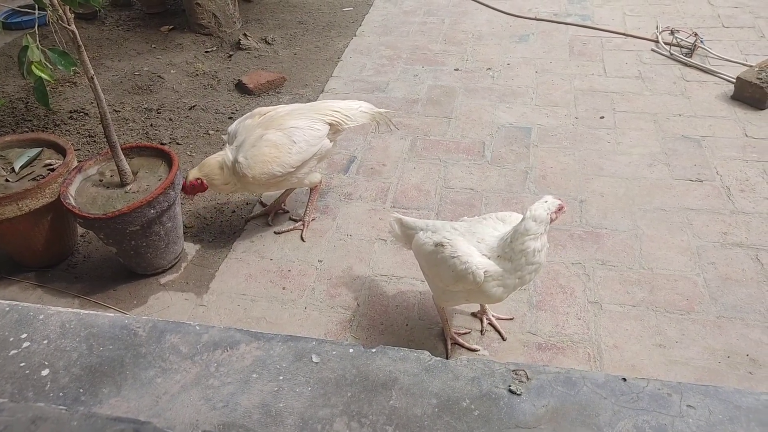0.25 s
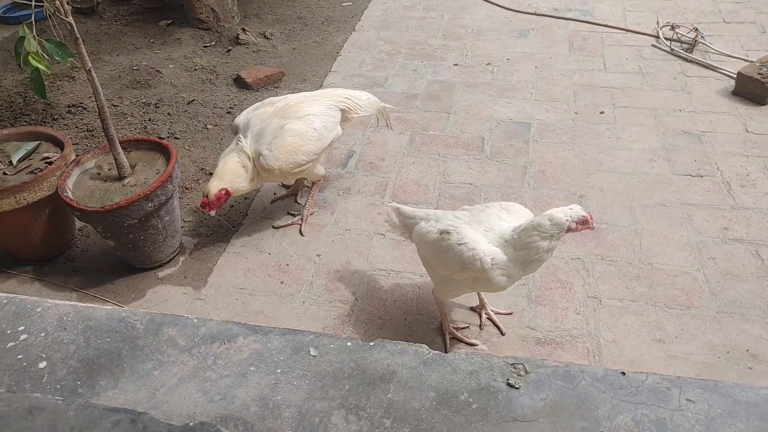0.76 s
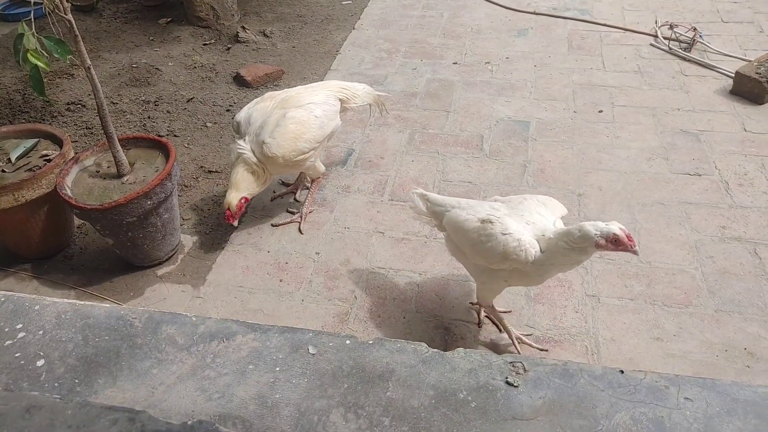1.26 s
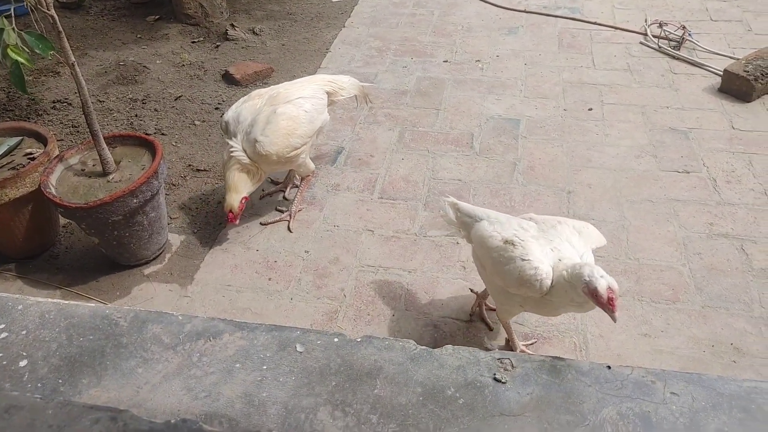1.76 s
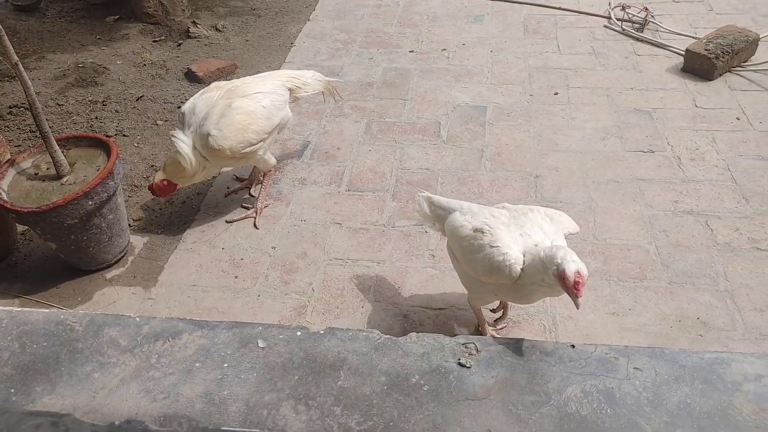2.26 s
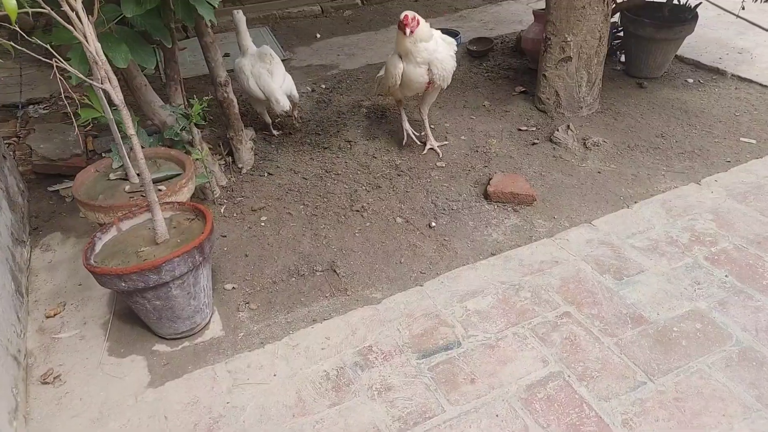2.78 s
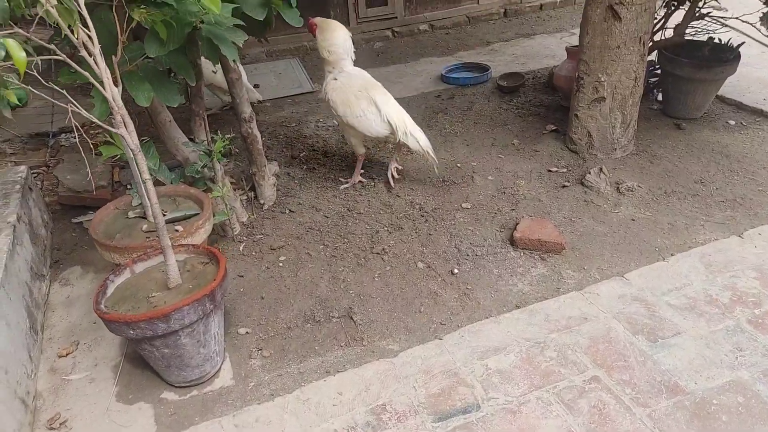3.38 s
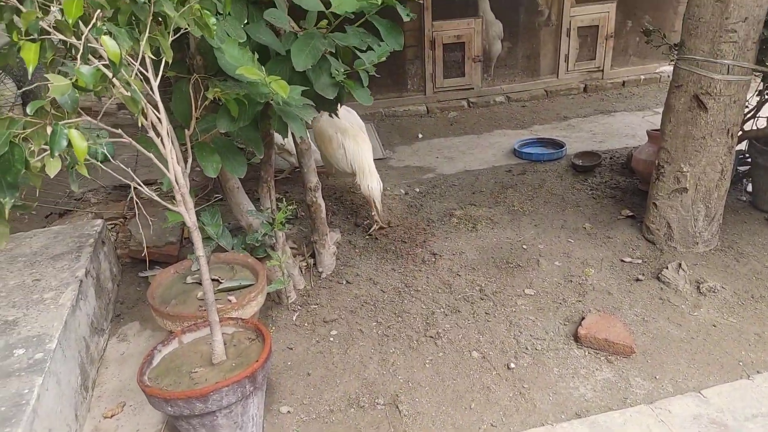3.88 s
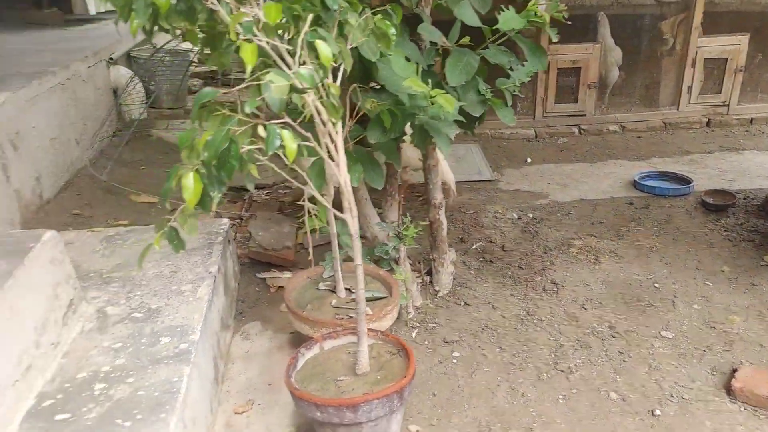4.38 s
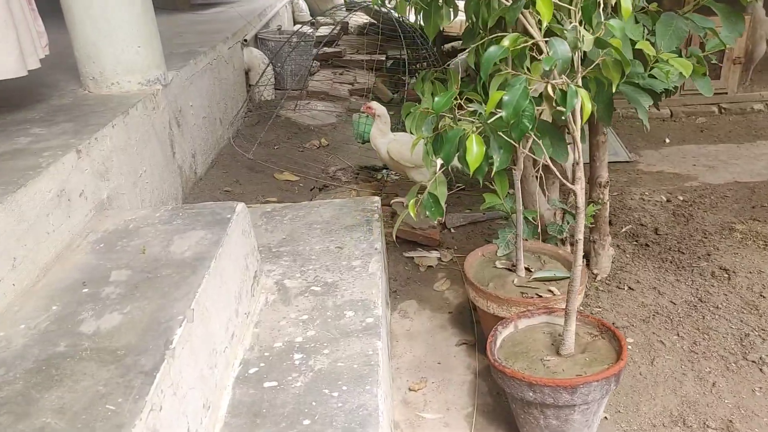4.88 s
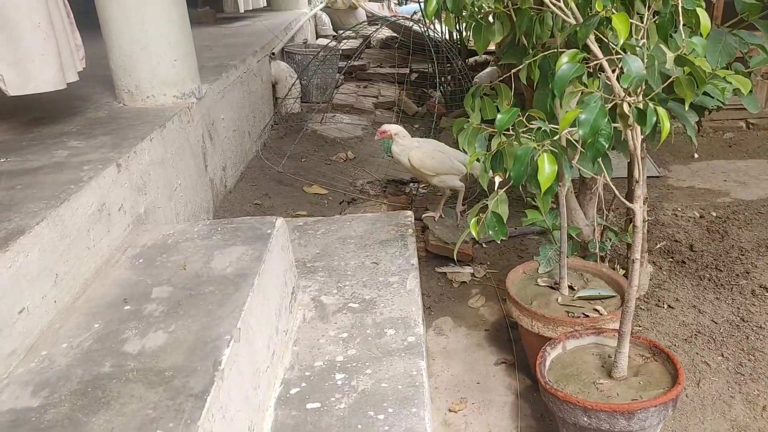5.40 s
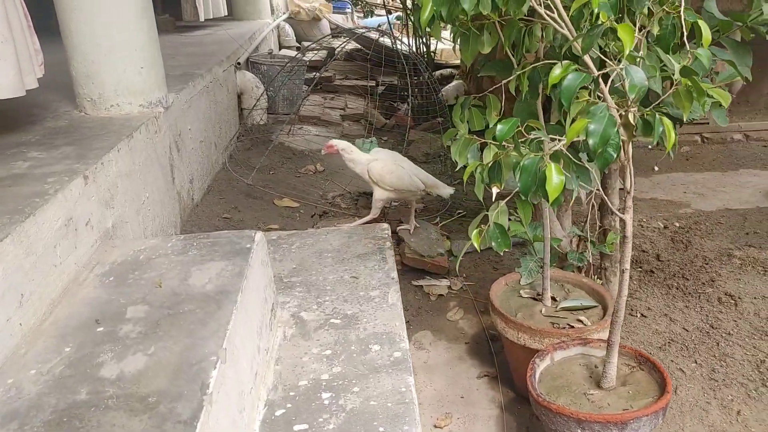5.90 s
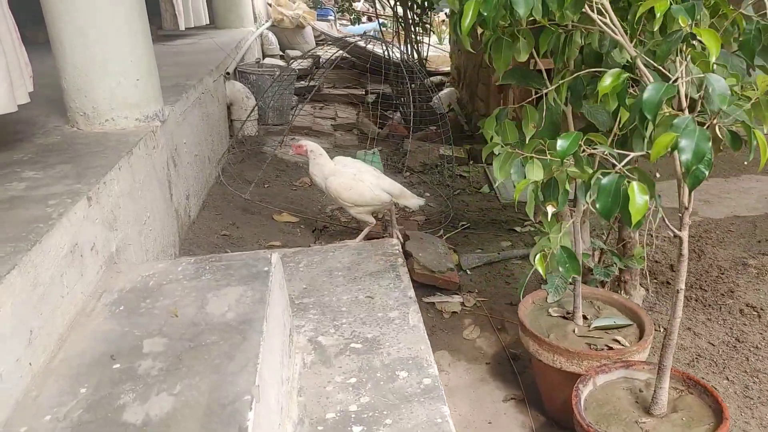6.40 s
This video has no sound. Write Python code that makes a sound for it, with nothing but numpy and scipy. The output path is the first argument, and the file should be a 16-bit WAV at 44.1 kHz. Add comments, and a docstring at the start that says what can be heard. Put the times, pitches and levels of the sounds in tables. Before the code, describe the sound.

A walled yard with hard, lively reflections and quiet outdoor air. From 0 s young birds peep without pause, slightly to the right: piercing whistles hold, plunge and end in a tiny chip, surrounded by a blurred wash of falling chirps and faint high chatter. Hens nearly ahead give round, hollow boks at about 0.2, 0.4, 0.7, 1.1 and 1.6 s, with hoarse clucks near 0.4, 0.9 and 2.0. A faint distant motor hum swells around 1.5 and 2.5. Everything cuts out very briefly at 2.6. Rough clucks follow near 3.1 and 3.7, with dry foot scuffs at 3.3 and 3.6, while strong peeps ring out around 3.1, 3.6 and 4.1. A soft scuff comes at 4.4, the hum returns near 4.9, and a cluck sounds at 5.1. A faint scuff follows at 5.6. Clucks and soft boks return at 6.0, then a low rolling croak at 6.4 and a last cluck at 6.6 amid denser chirping.

```python
"""Hens cluck in a walled brick courtyard: gliding tones make round boks, pulse-driven resonances hoarse clucks.
Young birds peep all the time: swept sines are held, plunge and end in an octave chip, amid a reverberant wash
of falling chirps and high chatter; a wavering sine is the faint high octave of peeps near 4.7 kHz. Feet scuff
dry ground as clumped, filtered noise; a distant motor drones as narrow noise bands over outdoor air; once the
sound drops out briefly."""
import sys
import numpy as np
from scipy import signal
from scipy.fft import rfft, irfft, next_fast_len
from scipy.io import wavfile
from scipy.ndimage import map_coordinates

SR = 44100
rng = np.random.default_rng(int(sys.argv[2]) if len(sys.argv) > 2 else 0)


def wav_out(sig):
    """Save sig, one row per channel (or a flat mono array), as 16-bit PCM at SR to the path in sys.argv[1]."""
    wavfile.write(sys.argv[1], SR, np.round(np.clip(np.atleast_2d(sig).T, -1, 1) * 32767).astype(np.int16))


N = 293265  # length in samples


def amp(db):
    """Level in decibels to amplitude ratio."""
    return 10 ** (np.asarray(db) / 20)


def unit(x):
    """Normalization to an RMS value of one."""
    return x / np.sqrt(np.mean(x ** 2) + 1e-20)


def at(rows, s):
    """Linear interpolation of a (t/s, value) curve at time s."""
    return np.interp(s, *np.transpose(rows))


def curve(rows):
    """Linear interpolation of a (t/s, value) curve at every sample."""
    return at(rows, np.arange(N) / SR)


def along(points, hz):
    """Interpolation of (f/Hz, value) points on a logarithmic frequency axis."""
    f, v = np.transpose(points)
    return np.interp(np.log(hz + 1), np.log(f + 1), v)


def progress(length):
    """Normalized time of a call, from 0 to 1."""
    return np.linspace(0, 1, int(length * SR))


def wobble(rate, n):
    """Band-limited fluctuation: a smooth random curve with rate knots a second."""
    knots = rng.standard_normal(int(n * rate / SR) + 4)
    return map_coordinates(knots, [np.arange(n) * rate / SR])


def phase_of(hz):
    """Phase as the time integral of instantaneous frequency."""
    return 2 * np.pi * np.cumsum(hz) / SR


def filtered(x, response):
    """Linear filtering: the spectrum times a complex frequency response."""
    n = x.shape[-1]
    m = next_fast_len(n + 4096)
    return irfft(rfft(x, m) * response(np.fft.rfftfreq(m, 1 / SR)), m)[..., :n]


def resonances(modes, f):
    """Modal superposition: causal second-order resonances of alternating sign."""
    total = 0
    for k, (center, width, db) in enumerate(modes):
        mode = 1j * f * width / (center * center - f * f + 1j * f * width)
        total = total + (-1) ** k * amp(db) * mode
    return total


# interaural likeness of diffuse sound: (f/Hz, left-right correlation)
LIKENESS = [(60, 0.66), (140, 0.94), (640, 0.49), (1500, 0.019)]


def diffuse(n):
    """Diffuse field: stereo noise that is alike in the bass and unrelated in the treble."""
    turn = lambda f: np.arccos(np.clip(along(LIKENESS, f), -1, 1)) / 2
    split = lambda f: np.array([np.cos(turn(f)), np.sin(turn(f))])
    mid, side = filtered(rng.standard_normal((2, n)), split)
    return np.array([mid + side, mid - side])


def yard(x, wet_db, t60, lead_ms=0, wall_db=-14, wall_s=0.031, build_s=0.0016, wet_right_db=0):
    """Reverberation: direct sound, one wall reflection and a diffuse tail that builds up and decays."""
    t = np.arange(SR // 2) / SR
    envelope = amp(-60 * t / t60) * (1 - np.exp(-(t / build_s) ** 2))
    tail = unit(diffuse(len(t)) * envelope) / np.sqrt(len(t))
    tail = tail * amp(wet_right_db * np.array([[-.5], [.5]]))
    x = np.pad(x, (0, len(t)))
    lead = np.array([[1], [-1]]) * lead_ms / 2000  # s, half of the interaural delay at each ear
    paths = lambda f: np.exp(2j * np.pi * f * lead) + amp(wall_db) * np.exp(-2j * np.pi * f * wall_s)
    reverberant = signal.fftconvolve(x[None], tail, axes=1)[:, :len(x)]
    return filtered(x, paths) + amp(wet_db) * reverberant


def add(track, s, x):
    """Superposition: mixes x into the track from time s on."""
    i = round(s * SR)
    x = x[..., max(-i, 0):max(N - i, 0)]
    track[..., max(i, 0):max(i, 0) + x.shape[-1]] += x


# direction of the hens: (t/s, left ear lead/ms)
HEN_LEAD = [(0, 0.35), (3.1, 0.33), (5.1, -0.18), (6.65, -0.15)]
# round boks: (t/s, length/s, first f/Hz, last f/Hz, level/dB)
BOKS = [(0.245, 0.024, 451, 619, -21), (0.442, 0.024, 549, 441.5, -16), (0.679, 0.03, 422.6, 455, -20),
        (1.114, 0.025, 680, 441, -26.5), (1.628, 0.017, 716, 438, -30.5), (4.08, 0.05, 1294, 1556, -38),
        (6.022, 0.12, 473.6, 392, -28.5), (6.109, 0.094, 852, 767, -33)]
# the lower a bok, the buzzier: above this pitch the overtones weaken with each octave
OVERTONE_DB, OVERTONE_AT_HZ, OVERTONE_DB_PER_OCTAVE = -19, 433, -48


def boks():
    """Frequency glide: a short, nearly pure tone slides in pitch and the yard's reverberation carries it on."""
    out = np.zeros((2, N))
    for s, length, first_hz, last_hz, db in BOKS:
        u = progress(length)
        hz = first_hz + (last_hz - first_hz) * u
        phase = phase_of(hz)
        octaves_up = max(np.log2(hz.mean() / OVERTONE_AT_HZ), 0)
        overtone_db = OVERTONE_DB + OVERTONE_DB_PER_OCTAVE * octaves_up
        overtones = np.sin(2 * phase) + np.sin(3 * phase) / 2 + np.sin(4 * phase)
        note = np.sin(np.pi * u) ** 2 * (np.sin(phase) + amp(overtone_db) * overtones)
        add(out, s, yard(amp(db) * note, wet_db=-2.5, t60=.85, lead_ms=at(HEN_LEAD, s), wall_db=-10))
    return out


# hoarse clucks: (t/s, length/s, level/dB, nominal voice f/Hz, brightness/dB per octave)
CLUCKS = [(-.12, 0.11, -42.5, 470, 1.5), (0.404, 0.067, -31.5, 506, 0), (0.921, 0.097, -34, 488.3, 2.5),
          (1.974, 0.076, -39, 503.4, 0), (3.098, 0.089, -30, 461.9, 1), (3.732, 0.067, -29.5, 482.1, 5),
          (4.089, 0.13, -49, 725, 12.5), (5.093, 0.088, -33.5, 451.4, 1.5), (5.993, 0.11, -30, 439.9, 3),
          (6.609, 0.048, -27, 394, 5)]
# resonances of a hen's throat: (f/Hz, width/Hz, level/dB)
THROAT = [(438, 214, -5.5), (732, 95, 6), (998, 98, 5.5), (1392, 82, -5), (1892, 223, -6)]
# harmonics of the voiced note, from the fundamental up: (level/dB)
HARMONICS = [0, -0.46, -13]
VOICE_DB = -6.5  # the voiced note against the rasp


def clucks(jitter=.1, scatter_db=2, waver=.03, arch=.08, opening=0.05, flutter_db=2, swell_db=9,
           edge_s=.012):
    """Source and filter: irregular syrinx slaps excite the throat, over a note that rises and sags with the push."""
    out = np.zeros((2, N))
    for s, length, db, voice_hz, bright_db in CLUCKS:
        u = progress(length)
        n = len(u)
        push = np.abs(np.sin(np.pi * u ** 1.5))
        phase = phase_of(voice_hz * (1 + arch * (push - .8) + waver * wobble(70, n)))
        # one slap every two voice cycles, unevenly timed
        slaps = np.diff(np.floor(phase / (4 * np.pi) + jitter * wobble(300, n)), prepend=0) > 0
        breath = rng.standard_normal(n) / 10
        source = unit(slaps * amp(scatter_db * rng.standard_normal(n))) + breath
        tilt = lambda f: amp(bright_db * np.log2(f / 800 + 0.08))
        edges = lambda f: 1 / (1 + (f / 2200) ** 12) / (1 + (240 / (f + 1)) ** 4)
        color = lambda f, scale: resonances(THROAT, f / scale) * edges(f) * tilt(f)
        throat = lambda scale: unit(filtered(source, lambda f: color(f, scale)))
        # resonances rise as the beak opens
        hoarse = unit(push ** 2 * throat(1) + (1 - push ** 2) * throat(1 - opening))
        partials = [amp(level) * tilt(k * voice_hz) * np.sin(k * phase)
                    for k, level in enumerate(HARMONICS, 1)]
        voice = unit(sum(partials))
        gate = np.minimum(np.minimum(u, 1 - u) * length / edge_s, 1)
        swell = gate * amp(db + swell_db * (push - 1) + flutter_db * wobble(130.3, n))
        cluck = swell * unit(hoarse + amp(VOICE_DB) * voice)
        add(out, s, yard(cluck, wet_db=0.5, t60=0.43, lead_ms=at(HEN_LEAD, s)))
    return out


# one low, rolling croak that rises and sinks: (t/s, nominal voice f/Hz, level/dB)
CROAK = [(6.418, 272.5, -39.5), (6.454, 289.6, -37.5), (6.468, 332.4, -32), (6.495, 413.5, -38.5),
         (6.526, 357, -36), (6.569, 219.5, -40.5)]


def croak(waver=.035, edge_hz=1150):
    """Pulse excitation: with the beak nearly shut, uneven pulses glide through the throat's resonances."""
    t = np.arange(CROAK[0][0], CROAK[-1][0], 1 / SR)
    s, voice_hz, db = np.transpose(CROAK)
    phase = phase_of(np.interp(t, s, voice_hz) * (1 + waver * wobble(250, len(t))))
    pulses = np.diff(np.floor(phase / (2 * np.pi)), prepend=0)
    voice = unit(filtered(pulses, lambda f: resonances(THROAT, f) / (1 + (f / edge_hz) ** 6)))
    call = voice * amp(np.interp(t, s, db))
    out = np.zeros((2, N))
    add(out, t[0], yard(call, wet_db=-2.5, t60=0.71, lead_ms=at(HEN_LEAD, t[0])))
    return out


HOLD_S, PEEP_ATTACK_S = .205, 0.058  # length up to the foot and rise of a peep at STEADY_HZ
FOOT_HZ, END_HZ, HOOK_S, CHIP_S = 3172, 2419, 0.0277, 0.037  # below the foot: a short hook toward END_HZ
SCOOP_HZ, SCOOP_S = 347.8, 0.022  # it slides up into the held pitch
STEADY_HZ, SAG_SHARE = 5387, 0.57  # birds below this pitch sag by this share of the difference


def plunge(t, top_hz, plunge_s):
    """Exponential glide, t counted from the foot: held, falling ever faster, then levelling out."""
    held = top_hz - SAG_SHARE * (STEADY_HZ - top_hz) * (t / HOLD_S + 0.38)
    falling = held - (held - FOOT_HZ) * np.exp(np.minimum(t, 0) / plunge_s)
    return falling - (FOOT_HZ - END_HZ) * (1 - np.exp(-np.maximum(t, 0) / HOOK_S))


def peep(top_hz, plunge_s, fall_db, octave_db=-10, shake=0.043, steady_shake=0.0016, flutter_db=4):
    """Frequency modulation: a whistle plunges and turns shaky; lower birds swell more slowly and hold less long."""
    hold_s = HOLD_S * top_hz / STEADY_HZ
    attack_s = PEEP_ATTACK_S * (STEADY_HZ / top_hz) ** 2
    t = np.arange(-hold_s, CHIP_S, 1 / SR)
    n = len(t)
    hz = plunge(t, top_hz, plunge_s)
    fall = (top_hz - hz) / (top_hz - END_HZ)  # 0 held, 1 at the end
    scoop = SCOOP_HZ * np.exp(-(t + hold_s) / SCOOP_S)
    phase = phase_of((hz - scoop) * (1 + (steady_shake + shake * fall) * wobble(303.0, n)))
    swell = np.minimum((t + hold_s) / attack_s, 1) * np.minimum((CHIP_S - t) / CHIP_S, 1)
    level = amp(fall_db * (fall - 1.0) + flutter_db * wobble(71.4, n))
    return swell * level * (np.sin(phase) + amp(octave_db) * np.sin(2 * phase))


def chip(shake=0.0093):
    """Second harmonic: the octave of a peep flares up from its foot on."""
    u = progress(CHIP_S)
    hz = 2 * plunge(u * CHIP_S, FOOT_HZ, HOOK_S)
    return np.sin(np.pi * u) * np.sin(phase_of(hz * (1 + shake * wobble(290, len(u)))))


def slur(length, first_hz, last_hz, bend=1.5, shake=0.01007, flutter_db=3):
    """Accelerating glide: a shaky note that slides down ever faster."""
    u = progress(length)
    hz = first_hz + (last_hz - first_hz) * u ** bend
    flutter = amp(flutter_db * wobble(189, len(u)))
    return flutter * np.sin(np.pi * u) * np.sin(phase_of(hz * (1 + shake * wobble(201.8, len(u)))))


# peeps: (t/s at the foot, nominal held f/Hz, plunge time constant/s,
# relative level/dB, chip level re that level/dB)
PEEPS = [(0.058, 4750, 0.023, -39.5, -9.5), (0.229, 4190, 0.034, -42, -2), (.522, 4786, 0.037, -45, -20),
         (0.757, 4770, 0.016, -45.5, -15), (0.906, 3930, 0.023, -40.5, -18.5),
         (1.158, 4604, 0.016, -44.5, -18), (1.302, 4210, 0.02, -38.5, 3), (1.592, 4845, 0.02, -43, -29.5),
         (1.791, 5364, 0.047, -40.5, -18), (2.078, 3860, 0.02, -42, -6), (2.3, 5220, 0.044, -43.5, -12.5),
         (2.415, 4284, 0.023, -41, -16), (2.955, 5375, 0.042, -46.5, -12), (3.134, 5530, 0.037, -36, -1.5),
         (3.222, 3905, 0.041, -44.5, -17), (3.57, 5450, 0.025, -35, 7), (4.088, 5463, 0.03, -34, 6.5),
         (4.642, 5340, 0.037, -37, 13.5), (5.319, 4950, 0.015, -38.5, 12), (5.759, 5300, 0.024, -37, 14.5),
         (6.249, 5134, 0.021, -40, 17.5)]
# level change of a peep over its fall, negative where it weakens: (t/s, level/dB)
FALL_LEVEL = [(2.4, -2.5), (3, -6.5)]
# slurred notes of other young birds: (t/s, length/s, first f/Hz, last f/Hz, relative level/dB)
SLURS = [(.2, 0.13, 6020, 5410, -47.5), (0.722, 0.13, 5930, 5110, -42.5), (1.175, 0.13, 5900, 5400, -44),
         (1.701, 0.1, 5160, 3650, -50), (1.89, 0.065, 4550, 4200, -47), (2.882, .07, 4900, 3700, -40.5),
         (2.116, .11, 6090, 5450, -47), (2.729, 0.15, 3646, 2930, -47), (2.822, 0.091, 6140, 5160, -41),
         (3.009, 0.11, 6540, 5400, -50.5), (3.356, 0.22, 4380, 3280, -44), (3.967, 0.076, 6260, 5450, -44),
         (4.481, 0.101, 6060, 5700, -37.5), (4.569, 0.048, 4460, 2750, -37.5),
         (5.425, 0.13, 4386, 3060, -38), (6.359, .13, 5070, 4210, -42), (5.663, .045, 6330, 5590, -42),
         (5.9, .17, 4930, 3640, -39), (6.515, 0.067, 5920, 4860, -32)]
# coloration by the beak: (f/Hz, level/dB)
BEAK = [(2500, 2.5), (4000, -5.5), (5600, -10.5), (6500, 3), (7600, -24), (9500, -17), (11000, -18.5)]


def young_birds(peep_db=-2):
    """Reflection: peeps, chips and slurs sound in the yard; the tail of peeps and slurs is stronger on the right."""
    calls, chips = np.zeros((2, N)), np.zeros(N)
    by_wall = lambda x: yard(x, wet_db=3.5, t60=0.62, wet_right_db=1.5)
    for s, top_hz, plunge_s, db, chip_db in PEEPS:
        call = peep(top_hz, plunge_s, at(FALL_LEVEL, s))
        start_s = s + CHIP_S - len(call) / SR
        add(calls, start_s, by_wall(amp(db + peep_db) * call))
        add(chips, s, amp(db + chip_db) * chip())
    for s, length, first_hz, last_hz, db in SLURS:
        add(calls, s, by_wall(amp(db) * slur(length, first_hz, last_hz)))
    chips_in_yard = yard(chips, wet_db=-3.5, t60=1.0)[:, :N]
    return filtered(calls + chips_in_yard, lambda f: amp(along(BEAK, f)))


# the wash of chirps over time: (t/s, level/dB)
WASH_LEVEL = [(0, -47.5), (2.6, -51), (3.6, -47), (5.1, -49.5), (5.5, -44.5), (6.65, -43)]
# coloration of the wash: (f/Hz, level/dB)
WASH_COLOR = [(2000, -5.5), (2900, 9.5), (4300, 5.5), (6300, -0.5), (7600, 4.5), (12000, -46)]
CHATTER_PER_S = 4.5  # chatter notes in each pitch band


def chirp_wash(bands=10, low_hz=3400, span_hz=3100, sag=.2, scatter_s=.06, chatter_rise_db=20):
    """Reverberant field: a blurred wash of falling chirps around each peep, with a high chatter that grows
    louder with pitch."""
    out = np.zeros((2, N))
    for band in range(bands):  # each band has its own pitch range
        around_peeps = [(s + scatter_s * (rng.standard_normal() - 1), 0) for s, *_ in PEEPS]
        beats = np.arange(-.5, N / SR, 1 / CHATTER_PER_S)
        chatter = [(s + rng.random() / CHATTER_PER_S, chatter_rise_db) for s in beats]
        chirps = np.zeros(N)
        for s, rise_db in around_peeps + chatter:
            height = (band + rng.random()) / bands
            top_hz = low_hz + span_hz * height
            chirp = slur(0.045 * (1 + rng.random()), top_hz, top_hz * (1 - sag))
            add(chirps, s, amp(rise_db * height) * chirp)  # chatter strengthens with pitch
        add(out, 0, yard(chirps, wet_db=8, t60=.55))
    return amp(curve(WASH_LEVEL)) * unit(filtered(out, lambda f: amp(along(WASH_COLOR, f))))


# bouts of the faint high octave: (first t/s, last t/s, level of the direct sound/dB)
OCTAVE_BOUTS = [(0.399, 3, -73), (4.209, 5.7, -69), (6.291, 6.4, -66)]
OCTAVE_EVERY_S, OCTAVE_S = 0.68, 0.17  # repetition period and length of a note


def high_octave(hz=9450):
    """Second harmonic: the faint octave of peeps near 4.7 kHz, a wavering sine, returns at an even pace."""
    out = np.zeros((2, N))
    n = int(OCTAVE_S * SR)
    for first, last, db in OCTAVE_BOUTS:
        for s in np.arange(first, last, OCTAVE_EVERY_S):
            tone = np.sin(phase_of(hz * (1 + 0.0059 * wobble(183, n))))
            note = tone * signal.windows.tukey(n, .5)
            add(out, s, yard(amp(db) * note, wet_db=18.0, t60=0.4))
    return out


# scuffs on dry earth: (t/s, length/s, level/dB)
SCUFFS = [(3.311, 0.12, -46), (3.577, 0.11, -36.5), (4.396, 0.06, -44.5), (5.63, 0.11, -46)]
# spectrum of the grit: (f/Hz, level/dB)
GRIT = [(200, -27.5), (2800, 3), (6300, 5.5), (8000, -8), (15000, -18)]


def scuffs(grain_db=7):
    """Frictional noise: feet drag over grit in clumps of tiny cracks."""
    out = np.zeros((2, N))
    for s, length, db in SCUFFS:
        u = progress(length)
        grains = rng.standard_normal(len(u)) * amp(grain_db * wobble(900, len(u)))
        scrape = unit(filtered(grains, lambda f: amp(along(GRIT, f)))) * np.sin(np.pi * u)
        add(out, s, yard(amp(db) * scrape, wet_db=-2, t60=.28))
    return out


# the motor drone over time: (t/s, level/dB)
MOTOR_LEVEL = [(1.3, -62), (1.48, -51), (1.98, -61.5), (2.52, -53), (2.7, -72), (4.61, -65.5),
               (4.87, -51.5), (5.58, -74.5)]
# bands of the drone: (f/Hz, width/Hz, level/dB before the response is squared)
DRONE = [(143.8, 30.3, -0.5), (177.2, 9.5, -0.5)]
# spectrum of the outdoor air: (f/Hz, level/dB)
AIR = [(25, -16), (130, -9), (250, -4.5), (600, -10.5), (1200, -15.5), (5000, -15), (8000, -23.5),
       (15000, -36)]


def background(air_db=-57):
    """Filtered noise: outdoor air, and narrow bands whose beating makes a distant motor's drone."""
    air_level = amp(air_db + 0.77 * wobble(3.306, N))
    air = unit(filtered(diffuse(N), lambda f: amp(along(AIR, f)))) * air_level
    drone = unit(filtered(diffuse(N), lambda f: np.abs(resonances(DRONE, f)) ** 2))
    return air + amp(curve(MOTOR_LEVEL)) * drone


# direction of the young birds: (f/Hz, left-right level difference/dB)
BIRD_SIDE = [(2500, -3.5), (4000, -3), (5400, -11), (6800, -17.5), (9000, 6)]


def scene():
    """Interaural differences: level sets the young birds off to the right, delay the hens nearly ahead."""
    sides = lambda f: amp(np.array([[.5], [-.5]]) * along(BIRD_SIDE, f))
    birds = filtered(young_birds() + chirp_wash(), sides)
    return boks() + clucks() + croak() + birds + high_octave() + scuffs() + background()


# the brief silence: (first t/s, last t/s)
PAUSE = (2.6, 2.674)
TOP_HZ = 15500  # upper band limit


def record(dry):
    """Gating and band limitation: a brief silence, then a low-pass filter."""
    t = np.arange(N) / SR
    sounding = (t < PAUSE[0]) | (t > PAUSE[1])
    return filtered(dry * sounding, lambda f: f < TOP_HZ)


dry = scene()
out = record(dry)
wav_out(out)
```